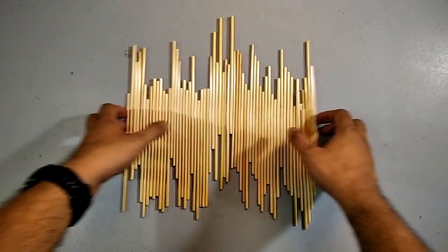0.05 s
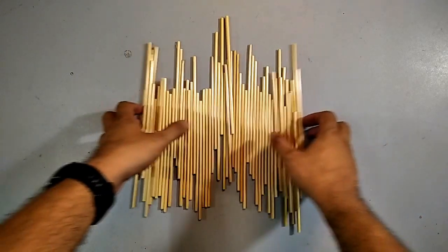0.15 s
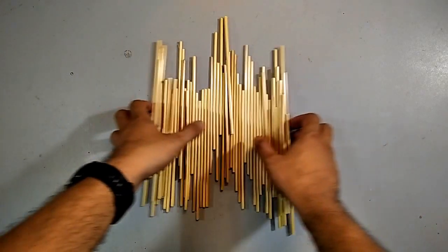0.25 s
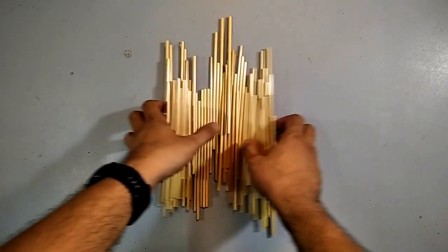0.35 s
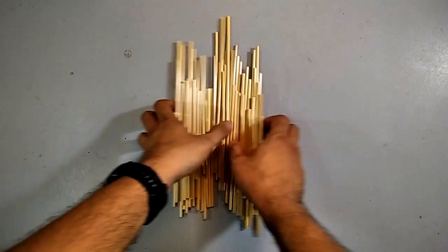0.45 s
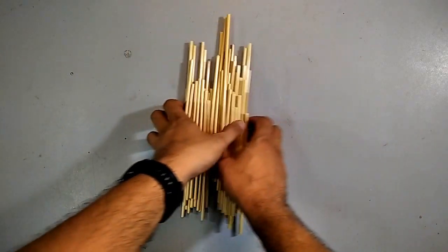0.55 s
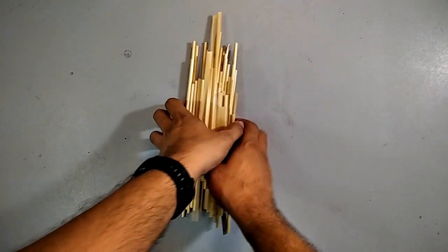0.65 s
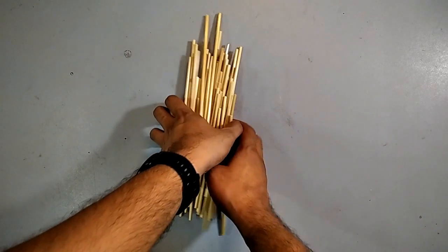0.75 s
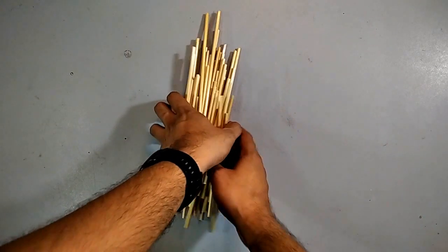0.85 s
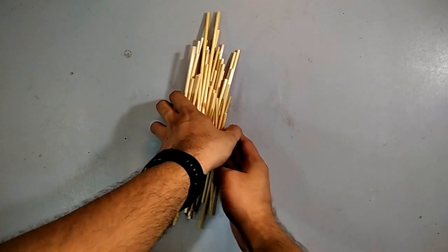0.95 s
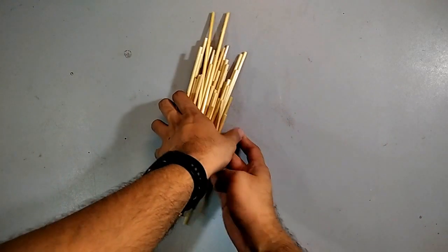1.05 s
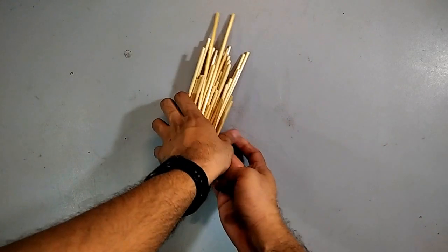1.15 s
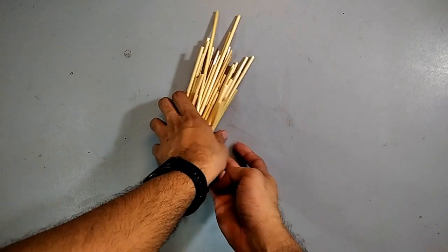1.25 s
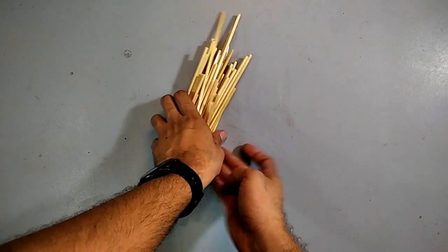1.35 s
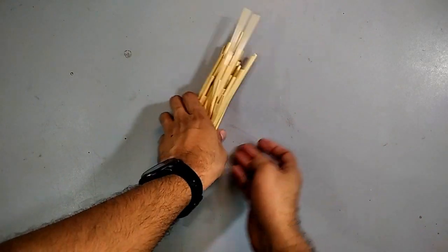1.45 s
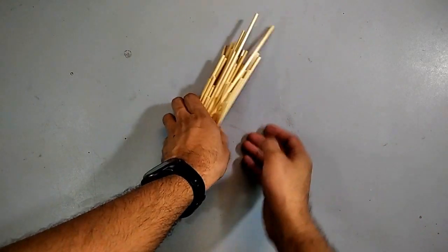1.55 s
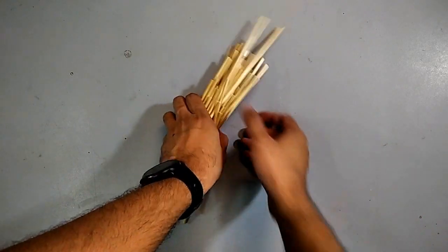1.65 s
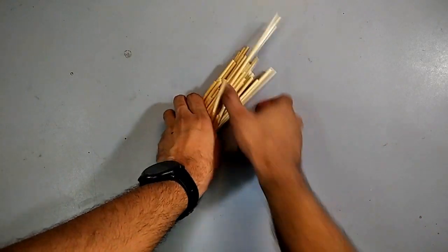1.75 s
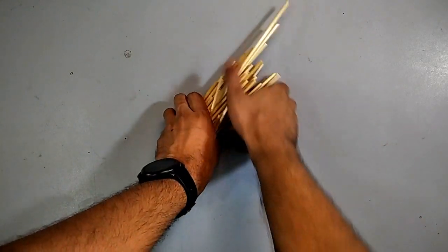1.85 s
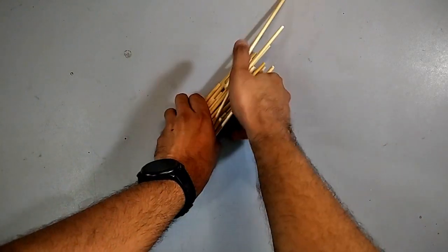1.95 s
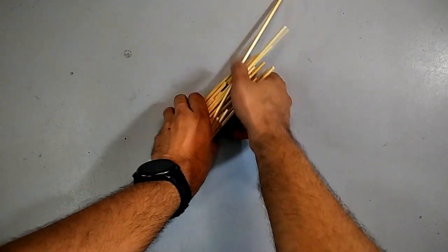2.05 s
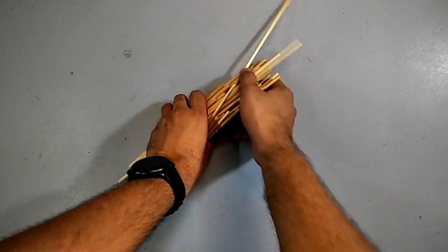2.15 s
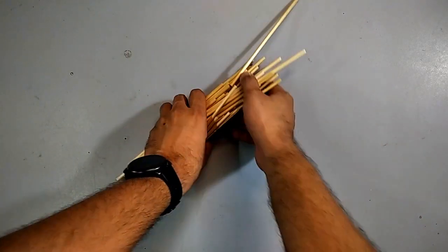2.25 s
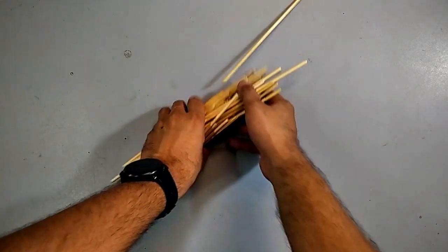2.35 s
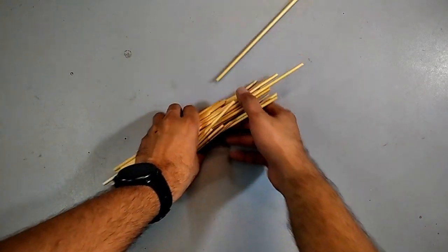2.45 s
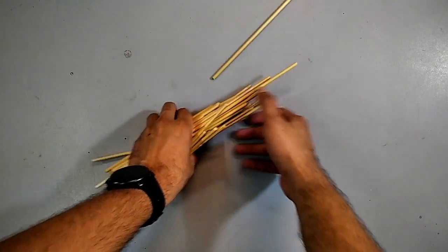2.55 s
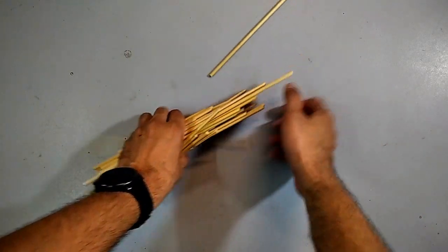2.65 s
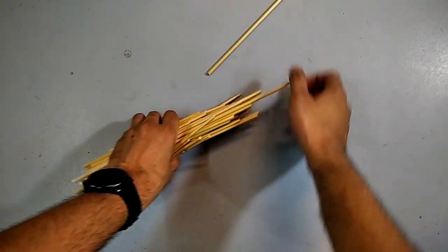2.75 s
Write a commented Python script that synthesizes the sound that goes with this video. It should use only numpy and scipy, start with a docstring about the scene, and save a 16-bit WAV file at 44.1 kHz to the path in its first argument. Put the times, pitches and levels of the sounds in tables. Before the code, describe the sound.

Thin bamboo sticks rattle brightly as they are swept together, then click and knock in hand

```python
"""Thin bamboo sticks are swept together over a tabletop, then shuffled into a bundle by hand.
Each contact is a noise crack plus damped bending modes; random trains of them make the rattle.
Sharp clicks, woody knocks and a loose ringing stick stand out; filtered impacts and noise
make the table rumble, bump and scrape. A small hard room answers over low air noise and
a faint mains hum; two close microphones listen."""
import sys
import numpy as np
from scipy import signal
from scipy.fft import rfft, irfft
from scipy.io import wavfile

SR = 44100
rng = np.random.default_rng(int(sys.argv[2]) if len(sys.argv) > 2 else 0)


def dump_mix(stems):
    """Bounce the given channels to the path in sys.argv[1] as a 16-bit WAV at rate SR."""
    frames = np.atleast_2d(stems).T  # one column per channel
    limited = np.clip(frames, -1, 1)  # hard clip at full scale
    pcm = np.round(limited * 32767).astype(np.int16)
    wavfile.write(sys.argv[1], SR, pcm)


N = 125685  # length [samples]

# The sweep: (time [s], bright ticking level before trim [dB], duller clacking level [dB])
SWEEP = [(0.0,-62,-86),(.11,-61.5,-58),(.17,-56.5,-62),(.225,-34,-58.5),(.27,-27.5,-54),(.36,-26,-50.5),(.46,-23.5,-48.5),(.55,-19.5,-43.5),(.605,-26.5,-46.5),(.65,-19,-44.5),(.71,-28,-45),(.77,-19.5,-43.5),(.83,-24,-39),(.885,-27,-48),(.92,-43,-49),(.97,-23,-46),(1.01,-42.5,-48),(1.12,-49,-52),(1.25,-47.5,-58),(1.37,-47,-55),(2.85,-57,-72)]
# Shuffles of the bundle: (peak time [s], rise [s], fall [s],
# ticking level before trim [dB], clacking level [dB])
SHUFFLES = [(1.047,0.017,0.037,-30.5,-51),(1.18,0.045,0.019,-34,-46),(1.43,0.027,0.056,-29.5,-42.5),(1.491,.025,0.0087,-20.5,-44.5),(1.60,0.027,0.042,-26.5,-39.5),(1.665,.018,0.022,-27.5,-39.5),(1.776,0.023,0.031,-27.5,-40.5),(1.873,0.02,0.023,-23,-35.5),(1.905,0.018,0.011,-23.5,-41),(1.96,0.019,0.019,-47,-42),(2.035,0.015,0.017,-37,-45),(2.11,0.022,0.041,-35.5,-45),(2.282,0.013,0.048,-29,-44.5),(2.468,0.011,0.009,-30.5,-39.5),(2.525,0.022,0.028,-35,-44.5),(2.564,0.0041,0.0059,-28,-42),(2.582,.008,0.012,-33,-44),(2.65,0.0092,0.011,-35.5,-58),(2.728,0.011,0.018,-39,-49),(2.785,0.02,0.02,-39,-49)]
# Stick-on-stick spectrum: (frequency [Hz], relative density [dB per Hz])
TICK_SPECTRUM = [(200,-36),(1500,-34),(3000,-22),(3650,-18),(4400,-8),(5300,-11),(6100,-7.5),(7300,-0.5),(8600,0.5),(9700,-2),(11200,-11),(12600,-9.5),(14200,-19),(16000,-27.5)]
# Duller stick-on-table spectrum: (frequency [Hz], relative density [dB per Hz])
CLACK_SPECTRUM = [(60,-32),(200,-6.5),(380,-9.5),(650,-12.5),(1000,-13.5),(1600,-6),(2400,2.5),(3200,2),(4500,0),(7000,-3),(15000,-33)]
# Light contact in the rattle: (ring t60 [s], crack decay [s], crack share of power [0-1], rise [s])
LIGHT_CONTACT = (0.019, 0.00075, 0.63, 0.00052)
# Hard single contact: (ring t60 [s], crack decay [s], crack share of power [0-1], rise [s])
HARD_CONTACT = (0.017, 0.00048, 0.69, 0.00029)
# Sharp single contacts: (time [s], tick level before gain [dB], clack level before gain [dB],
# tick left minus right [dB], tick treble tilt [dB per octave])
CLICKS = [(0.2354,-14,-47,-6,3),(0.254,-9,-60,-6,9),(.2563,-6,-43,-7,8.5),(.2580,-8,-52,10,6),(.2955,-13,-47,0,2),(.3090,-17,-49,0,14.5),(.3130,-13,-51,1,1),(0.3146,-9.5,-52,-3,8.5),(0.4192,-7,-42,6.5,8),(0.5113,-10,-27,6,3.5),(.5480,-7,-29,13,7),(0.6398,-8.5,-31,-3,2),(0.8253,-12,-39,0,-11),(0.8833,-15,-28,3,-5),(.9310,-15,-44,8,-1),(1.1474,-25,-45,-1,-5),(1.1607,-25,-46,5,-13),(1.166,-16,-40,2,-3.5),(1.2977,-26.5,-42,5,-4),(1.3851,-19,-31,0,-6),(1.4234,-19.5,-53,-7,-3),(1.461,-18,-33,6,-2),(1.4923,-22,-26,1,-4),(1.5936,-14,-34,13,7),(1.6610,-17.5,-23.5,4,-7),(1.665,-18,-33,2,10),(1.7697,-19,-48,-11,-4),(1.8488,-16,-27,1,2),(1.918,-8.5,-39,-1,-2.5),(1.9310,-14,-41,14,0),(1.9472,-10.5,-29,-9,3),(1.9556,-5,-23.5,0.5,7),(1.9578,-14,-35,2.5,5),(2.107,-18.5,-38,11,4),(2.1117,-16,-35,0,6),(2.1784,-33,-53,-1,0),(2.2505,-21.5,-33,4,2),(2.2729,-15.5,-27,20,-4),(2.2768,-7.5,-24.5,1.5,13.5),(2.2832,-26,-26,-18,4),(2.357,-14,-30,0,4),(2.4608,-19,-36,-5,5),(2.4635,-19,-33,0,-3),(2.4666,-15.5,-34,9,11),(2.472,-32,-33,12,10),(2.5521,-10,-27,1,18.5),(2.5556,-17,-28.5,-6,-2),(2.5775,-20,-33,10,6),(2.6950,-24,-54,-3,13),(2.7019,-29,-45,-6,3),(2.7648,-26,-51,-1,0),(2.7778,-29,-44,-6,2),(2.796,-22,-44,-2.5,4),(2.7998,-20.5,-34.5,7,17)]
# Stick ends knocking on the tabletop: (time [s], level [dB])
KNOCKS = [(1.6612,-22),(2.2770,-17.5),(2.3573,-20),(2.4598,-21),(2.467,-19),(2.5530,-20),(2.5600,-19),(2.5783,-23),(2.7440,-23.5),(2.765,-28),(2.7775,-26),(2.7865,-26),(2.7975,-24)]
# Knock spectrum: (frequency [Hz], relative density [dB per Hz])
KNOCK_SPECTRUM = [(100,-28),(450,-15),(750,-8),(1050,0.5),(1450,2),(2300,-1),(3200,-12),(6000,-30),(15000,-45)]
# Knock contact: (ring t60 [s], crack decay [s], crack share of power [0-1], rise [s])
KNOCK_CONTACT = (0.037, 0.0018, 0.59, 0.00041)
# Taps on a loose stick: (time [s], level before trim [dB], left minus right [dB])
LOOSE_TAPS = [(2.1591,-18,13),(2.2763,-10.5,11),(2.551,-37,-3),(2.6950,-22,1),(2.7322,-25,4)]
# Bending modes of the loose stick: (frequency [Hz], relative level [dB], t60 [s])
LOOSE_MODES = [(4780,-12.5,.05),(7300,-7,0.031),(8300,0,0.01),(10000,3.5,0.011),(12900,-9,.012)]
# Rumble of the tabletop under rolling sticks: (time [s], level before trim [dB])
ROLL = [(0.0, -52), (0.018, -64), (0.03, -48), (0.1, -39), (0.122, -46.5), (0.172, -41.5), (0.228, -47),
        (0.264, -41.5), (0.342, -47.5), (0.38, -44), (0.48, -42.5), (0.504, -53), (0.52, -44),
        (0.732, -45.5), (0.912, -65.5), (1.0, -53.5)]
# Tabletop spectrum under rolling: (frequency [Hz], relative density [dB per Hz])
TABLE_SPECTRUM = [(40,-25),(110,-17),(190,-13),(240,-1),(275,3),(330,-8),(430,-11.5),(560,-18.5),(760,-19.5),(1300,-26),(3000,-61)]
# Bundle and hands bumping the tabletop: (time [s], level before envelope [dB], decay [s])
BUMPS = [(.034,-42,0.0087),(.985,-58.5,0.031),(1.555,-48.5,0.091),(1.655,-55,0.021),(1.855,-47,0.077),(2.464,-47.5,0.04),(2.555,-53.5,0.033),(2.742,-45.5,0.015),(2.778,-49,0.04)]
# Bump spectrum: (frequency [Hz], relative density [dB per Hz])
BUMP_SPECTRUM = [(50,-23),(140,-5),(220,9),(360,9),(550,-4),(900,-6.5),(1500,-23),(3000,-14.5),(8000,-34)]
# Spectrum of a soft, deep push: (frequency [Hz], relative density [dB per Hz])
THUD_SPECTRUM = [(25,-9),(60,-8),(120,3),(200,-13),(500,-32),(2000,-57)]
# Sticks scraping along the table: (peak time [s], half length [s], peak level [dB],
# resonance [Hz], width of each of two filter passes [Hz])
SCRAPES = [(0.122,0.028,-51,1240,510),(0.514,.028,-50.5,733,111),(0.64,0.065,-54.5,690,200)]
# Reverberation time: (frequency [Hz], t60 [s])
ROOM_T60 = [(200,0.23),(700,1),(2000,0.47),(5000,0.67),(9000,0.45),(14000,0.49)]
# Stereo width of the tail: (frequency [Hz], share of left-right difference [0-1])
ROOM_WIDTH = [(300,0.19),(1000,0.88),(2500,0.33),(5000,0.79),(14000,1)]
# Room air spectrum: (frequency [Hz], relative density [dB per Hz])
AIR_SPECTRUM = [(20,-0.5),(60,-5.5),(100,-1),(160,3),(230,-6),(400,-8),(700,-18),(1500,-16),(4000,-28.5),(14000,-29)]
# Mains hum partials: (frequency [Hz], rms level [dB])
HUM = [(100.4,-66),(200.3,-60.5)]
# Microphone port balance: (frequency [Hz], left minus right [dB])
PORTS = [(100,0),(2500,1),(5000,-0.5),(6300,-1.5),(7400,-2.5),(8100,-2.5),(9000,7),(10000,5),(11500,2),(14000,3.5)]

STICK_HZ = 428.6  # median lowest bending mode
PITCH_SPREAD = 0.2487  # spread of log frequency, as stick lengths differ
TICKS_PER_S, TICK_SPREAD_DB = 1700, 4.5
CLACKS_PER_S, CLACK_SPREAD_DB = 1300, 3
TICKING_TRIM_DB, CLICK_GAIN_DB, LOOSE_TRIM_DB = -2.0, 13, -5
ROLL_BUMPS_PER_S, ROLL_SPREAD_DB, ROLL_TRIM_DB = 700, 2.5, 0.5
ROLL_STOP_S, ROLL_WIDTH = 0.078, 0.22  # final decay; share of left-right difference
THUD_S, THUD_DB, THUD_DECAY_S = 0.41, -45, 0.02  # level before the envelope
TAIL_DB, EARLY_DB, EARLY_DECAY_S = -3.5, -10, 0.0095
# turns per second through the sets of echo paths, which keeps the tail from sounding tonal
ROOM_TURNS_PER_S = 9
AIR_DB, AIR_WIDTH = -56, 0.37  # rms level; share of left-right difference
EDGE_HZ = 14450  # upper band limit


def amp(db):
    """Level law: decibels to amplitude gain."""
    return 10 ** (np.asarray(db) / 20)


def unit(x):
    """Power normalization: scales to rms 1."""
    return x / np.sqrt(np.mean(x ** 2) + 1e-20)


def read(points, hz):
    """Linear interpolation of a table on a log-frequency axis."""
    f, value = np.transpose(points)
    return np.interp(np.log(hz + 1), np.log(f + 1), value)


def add(mix, s, sound):
    """Superposition: adds a stereo sound to the mix at a time in seconds."""
    part = mix[:, max(round(s * SR), 0):][:, :sound.shape[1]]
    part += sound[:, :part.shape[1]]


def placed(pan_db):
    """Level-difference panning: left and right gains of constant power."""
    return unit(amp([[pan_db / 2], [-pan_db / 2]]))


def narrowed(x, width):
    """Inter-channel correlation: a shared part plus a share of left-right difference."""
    left = x[0] + width * x[1]
    right = x[0] - width * x[1]
    return np.array([left, right]) / np.sqrt(1 + width ** 2)


def colour(x, points, tilt_db=0, size=1024):
    """Minimum-phase filtering: a causal response with the given spectrum, tilted per octave."""
    hz = abs(np.fft.fftfreq(size, 1 / SR))
    pivot_hz = SR / 10  # the tilt acts only above this
    octaves = np.log2(np.maximum(hz, pivot_hz) / pivot_hz)
    log_gain = np.log(amp(read(points, hz) + tilt_db * octaves))
    response = np.exp(np.conj(signal.hilbert(log_gain)))
    taps = np.fft.ifft(response).real[:size // 2]
    return signal.fftconvolve(x, taps[None], axes=1)[:, :x.shape[1]]


def handling():
    """Power summation: the long sweep and short shuffles set the strength of the rattle."""
    t = np.arange(N) / SR
    s, *levels = np.transpose(SWEEP)
    power = np.array([amp(np.interp(t, s, db)) ** 2 for db in levels])
    for peak, rise, fall, tick_db, clack_db in SHUFFLES:
        onset = np.exp(-((t - peak) / rise) ** 2)
        release = np.exp(-abs(t - peak) / fall)
        swell = np.where(t < peak, onset, release)
        power += amp([[tick_db], [clack_db]]) ** 2 * swell
    tick_level, clack_level = np.sqrt(power)
    ticking = rattle(TICKS_PER_S, TICK_SPREAD_DB, TICK_SPECTRUM, tick_level)
    clacking = rattle(CLACKS_PER_S, CLACK_SPREAD_DB, CLACK_SPECTRUM, clack_level)
    return amp(TICKING_TRIM_DB) * ticking + narrowed(clacking, width=0.47)


def rattle(per_s, spread_db, spectrum, level, count=90):
    """Shot noise: many pairs of sticks knock at random, as hard as the hands move them."""
    train = impacts(per_s, spread_db) * level
    pair = rng.integers(0, count, N)
    rings = np.array([colour(contact(*LIGHT_CONTACT), spectrum) for _ in range(count)])
    rings /= np.sqrt((rings ** 2).sum(2).mean())  # mean energy 1
    out = np.zeros((2, N))
    for at in np.flatnonzero(train):
        add(out, at / SR, train[at] * rings[pair[at]])
    return out


def impacts(per_s, spread_db):
    """Random point process: blows of uneven size and random sign, rms 1."""
    size = amp(spread_db * np.minimum(rng.exponential(1, N), np.pi))
    sign = rng.choice([-1, 1], N)
    struck = rng.random(N) < per_s / SR
    return unit(size * sign * struck)


def contact(ring_s, crack_s, crack_share, rise_s, size=1200, count=8):
    """Modal impact: a brief crack and damped free-bar bending modes of two sticks, in stereo."""
    t = np.arange(size) / SR
    lowest_hz = STICK_HZ * np.exp(PITCH_SPREAD * rng.standard_normal((2, 1)))
    ratios = ((2 * np.arange(1, count + 1) + 1) / 3) ** 2
    hz = (lowest_hz * ratios).ravel()
    cycles = hz[:, None] * t + rng.random((2, len(hz), 1))  # each side has its own phases
    audible = (hz < SR / 2)[:, None]
    modes = (np.sin(2 * np.pi * cycles) * audible).sum(1)
    press = 1 - np.exp(-(t / rise_s) ** 2)
    ring = press * modes * np.exp(-np.log(1000) * t / ring_s)
    crack = press * rng.standard_normal((2, size)) * np.exp(-t / crack_s)
    return np.sqrt(crack_share) * unit(crack) + np.sqrt(1 - crack_share) * unit(ring)


def clicks():
    """Hard impact excitation: sharp bright ticks, each with a duller clack under it."""
    out = np.zeros((2, N))
    for s, tick_db, clack_db, pan_db, tilt_db in CLICKS:
        tick = colour(contact(*HARD_CONTACT), TICK_SPECTRUM, tilt_db)
        clack = narrowed(colour(contact(*LIGHT_CONTACT), CLACK_SPECTRUM), width=0.52)
        # energy 1 in each channel
        tick /= np.linalg.norm(tick, axis=1, keepdims=True)
        clack /= np.linalg.norm(clack, axis=1, keepdims=True)
        add(out, s, amp(tick_db) * placed(pan_db) * tick + amp(clack_db) * clack)
    return out * amp(CLICK_GAIN_DB)


def knocks():
    """Impact on a plate: a stick end meets the table with a short woody knock."""
    out = np.zeros((2, N))
    for s, level_db in KNOCKS:
        knock = narrowed(colour(contact(*KNOCK_CONTACT), KNOCK_SPECTRUM), width=0.89)
        add(out, s, amp(level_db) * knock * np.sqrt(2) / np.linalg.norm(knock))
    return out


def loose_stick(size=4000):
    """Free modal decay: a stick outside the grip rings as a sum of damped sines."""
    out = np.zeros((2, N))
    t = np.arange(size) / SR
    for s, level_db, pan_db in LOOSE_TAPS:
        ring = np.zeros((2, size))
        for hz, db, t60 in LOOSE_MODES:
            cycles = hz * t + rng.random((2, 1))
            ring += amp(db - 60 * t / t60) * np.sin(2 * np.pi * cycles)
        add(out, s, amp(level_db + LOOSE_TRIM_DB) * placed(pan_db) * ring)
    return out


def rolling():
    """Random plate excitation: uneven rolling sticks make the table drone until gathered."""
    t = np.arange(N) / SR
    s, db = np.transpose(ROLL)
    stopping = np.exp(-np.maximum(t - s[-1], 0) / ROLL_STOP_S)
    level = amp(np.interp(t, s, db) + ROLL_TRIM_DB) * stopping
    trains = np.array([impacts(ROLL_BUMPS_PER_S, ROLL_SPREAD_DB) for _ in range(2)])
    bumps = narrowed(trains, ROLL_WIDTH)
    return level * unit(colour(bumps, TABLE_SPECTRUM, size=4096))


def tabletop():
    """Plate and friction noise: dull bumps, a deep thud and scrapes along the table."""
    return table_bumps() + scrapes()


def table_bumps(size=12000):
    """Damped plate response: filtered noise with a short rise and exponential decay."""
    out = np.zeros((2, N))
    t = np.arange(size) / SR
    blows = [(*row, BUMP_SPECTRUM) for row in BUMPS]
    blows.append((THUD_S, THUD_DB, THUD_DECAY_S, THUD_SPECTRUM))
    for s, level_db, decay_s, spectrum in blows:
        noise = narrowed(rng.standard_normal((2, size)), width=0.41)
        body = unit(colour(noise, spectrum, size=2048))
        envelope = np.minimum(t / 0.0049, 1) * np.exp(-t / decay_s)
        add(out, s, amp(level_db) * body * envelope)
    return out


def scrapes():
    """Friction-driven resonance: noise passes a resonator twice under a Gaussian swell."""
    out = np.zeros((2, N))
    t = np.arange(N) / SR
    for peak, half, level_db, hz, width_hz in SCRAPES:
        b, a = signal.iirpeak(hz, hz / width_hz, SR)
        noise = narrowed(rng.standard_normal((2, N)), width=0.73)
        rub = signal.lfilter(b, a, signal.lfilter(b, a, noise))
        out += amp(level_db) * unit(rub) * np.exp(-((t - peak) / half) ** 2)
    return out


def room(x, count=5):
    """Time-varying reverberation: the sound passes through several sets of echo paths in turn."""
    turn = np.arange(N) / SR * ROOM_TURNS_PER_S
    offsets = np.arange(count)[:, None] / count
    shares = np.maximum(np.cos(2 * np.pi * (turn - offsets)), 0) ** 2
    shares /= np.sqrt((shares ** 2).sum(0))  # constant total power
    return sum(signal.fftconvolve(x * share, room_response(), axes=1)[:, :N] for share in shares)


def room_response():
    """Impulse response: early reflections from table and hands, then a diffuse decaying tail."""
    time = np.arange(SR) / SR
    hz, t, z = signal.stft(rng.standard_normal((2, SR)), SR, nperseg=256)
    decay = amp(-60 * t / read(ROOM_T60, hz)[:, None])
    z = narrowed(z, read(ROOM_WIDTH, hz)[:, None]) * decay
    tail = signal.istft(z, SR, nperseg=256)[1][:, :SR] * np.minimum(time / 0.0067, 1)
    sparse = rng.standard_normal((2, SR)) * (rng.random((2, SR)) < 2000 / SR)  # 2000 echoes per s
    early = sparse * np.exp(-time / EARLY_DECAY_S) * (time > .001)
    return (amp(TAIL_DB) * unit(tail) + amp(EARLY_DB) * unit(early)) / np.sqrt(SR)


def background():
    """Stationary noise and steady tones: low room air and mains hum."""
    t = np.arange(N) / SR
    noise = narrowed(rng.standard_normal((2, N)), AIR_WIDTH)
    sound = amp(AIR_DB) * unit(colour(noise, AIR_SPECTRUM, size=4096))
    for hz, db in HUM:
        sound += amp(db) * np.sqrt(2) * np.sin(2 * np.pi * (hz * t + rng.random()))
    return sound


def scene():
    """Linear superposition: sticks, their room response, table and background add."""
    sticks = handling() + clicks() + knocks() + loose_stick()
    return sticks + room(sticks) + rolling() + tabletop() + background()


def record(dry):
    """Transduction: port balance by frequency, soft saturation of high peaks, then a band limit."""
    lean_db = read(PORTS, np.fft.rfftfreq(N, 1 / SR))
    heard = irfft(rfft(dry) * amp([lean_db / 2, -lean_db / 2]), N)
    heard = heard / (1 + (heard / .62) ** 4) ** .25
    lowpass = signal.firwin(301, EDGE_HZ, window=("kaiser", 8), fs=SR)
    return signal.oaconvolve(heard, lowpass[None], "same")


dry = scene()
out = record(dry)
dump_mix(out)
```